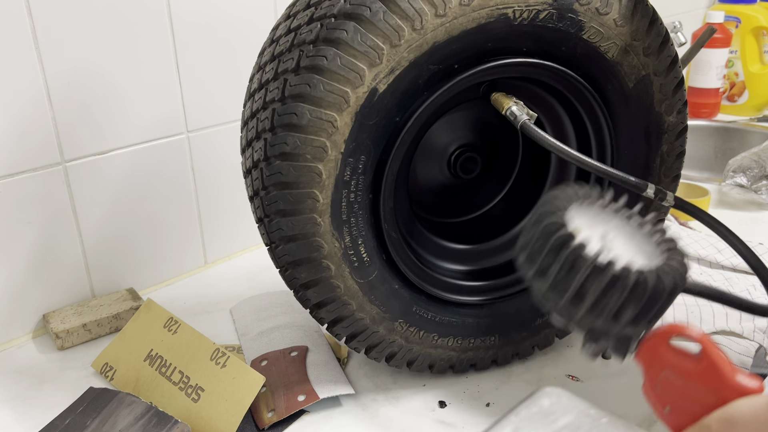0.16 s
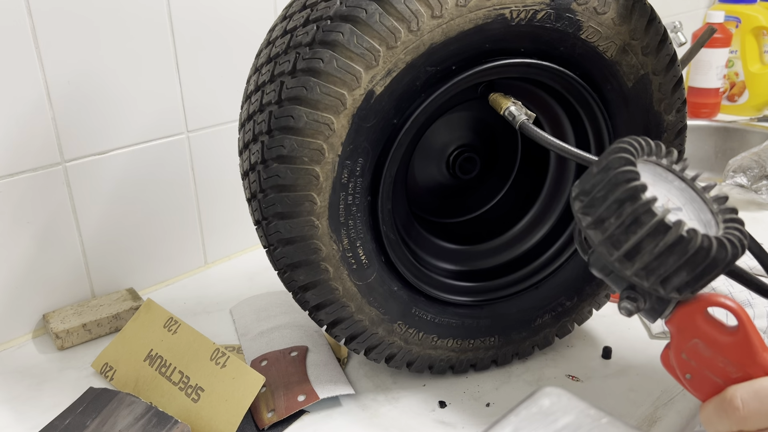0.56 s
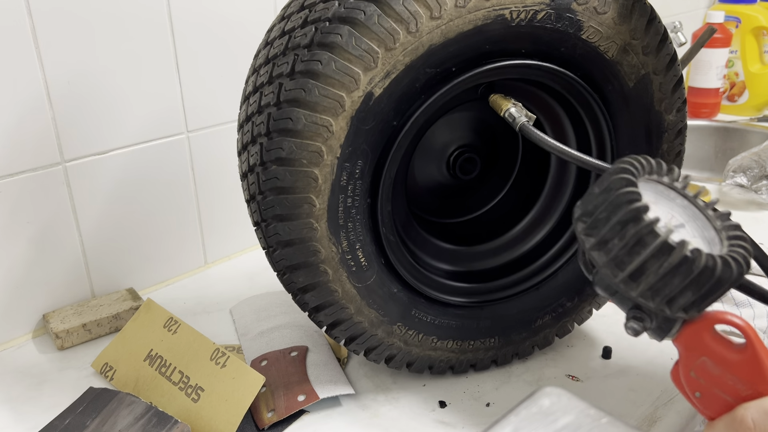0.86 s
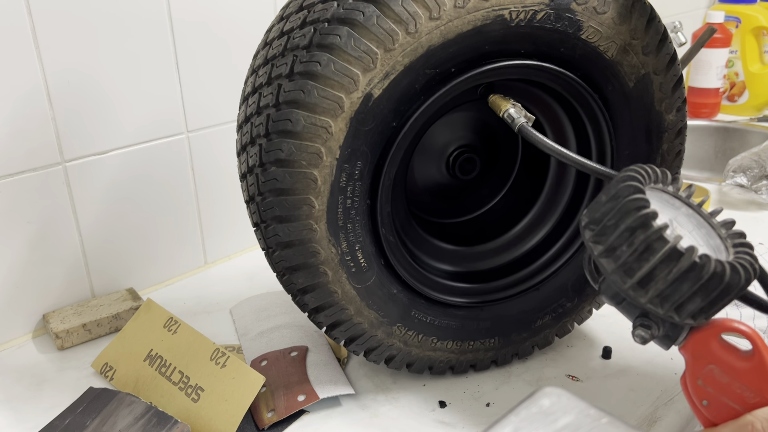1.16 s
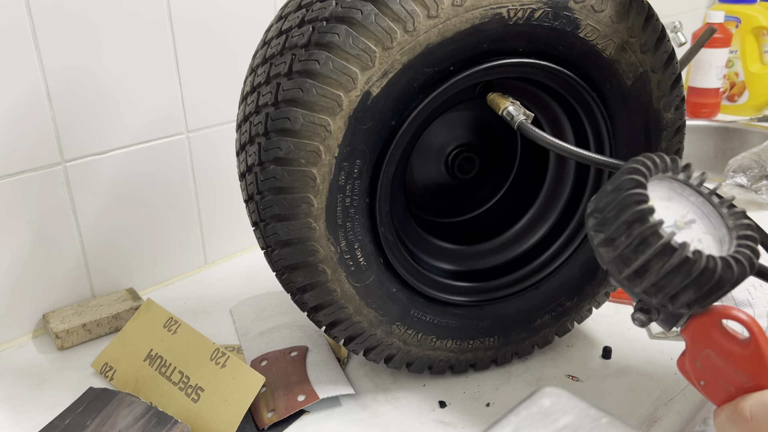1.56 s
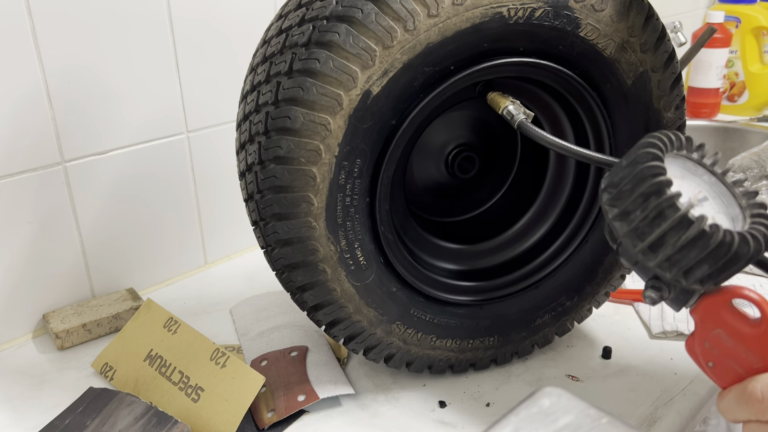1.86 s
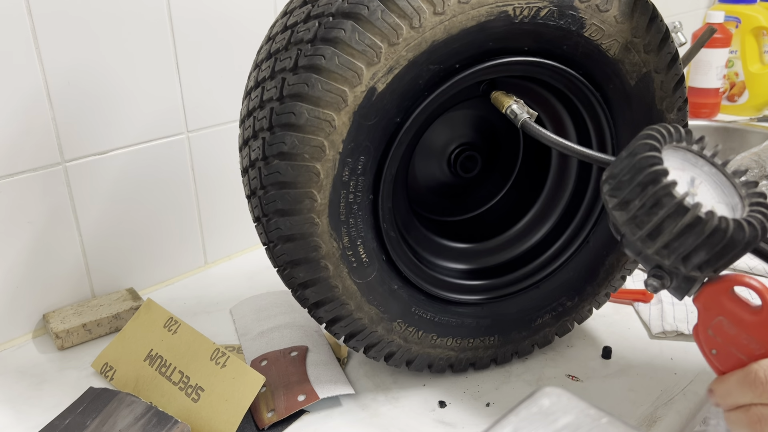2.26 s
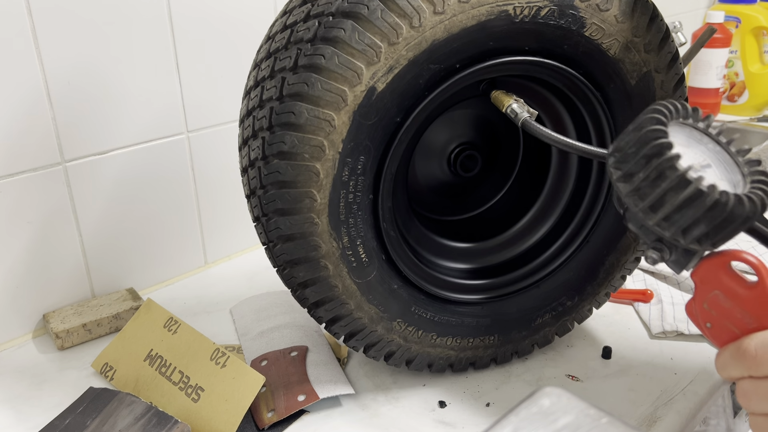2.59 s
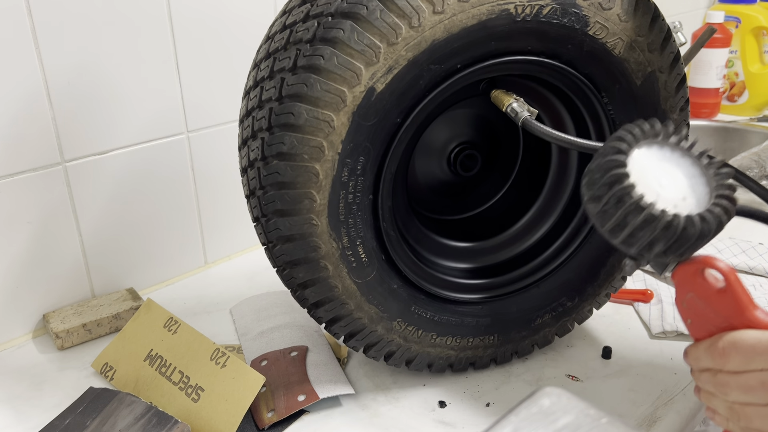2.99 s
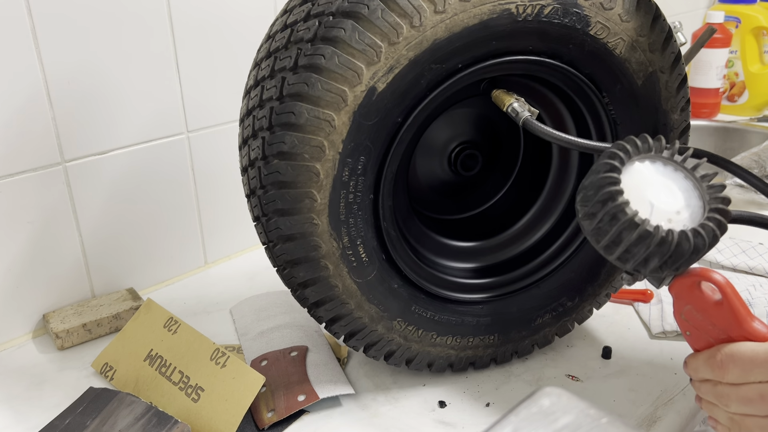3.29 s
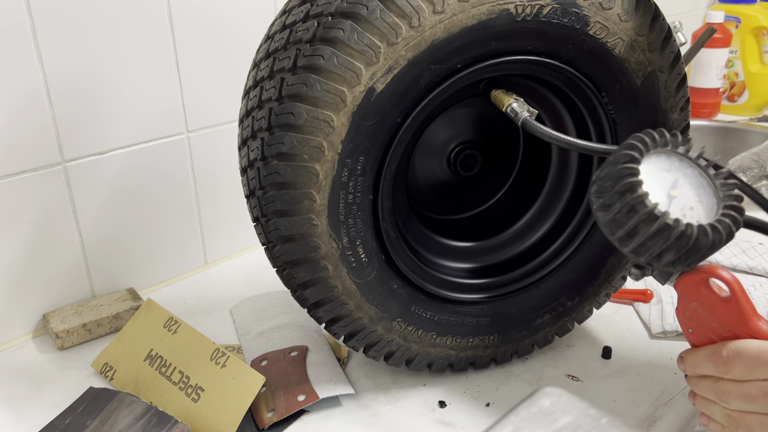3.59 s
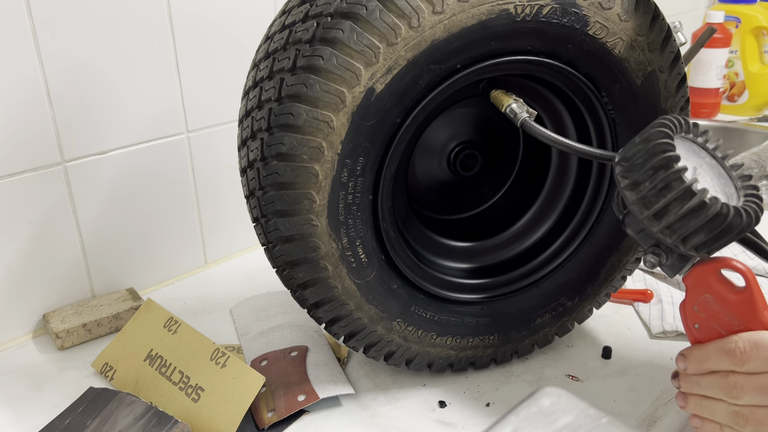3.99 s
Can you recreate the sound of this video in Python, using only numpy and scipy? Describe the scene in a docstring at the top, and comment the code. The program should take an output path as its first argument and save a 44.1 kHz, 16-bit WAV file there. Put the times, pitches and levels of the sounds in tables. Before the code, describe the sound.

A small piston compressor drones indoors, feeding a tyre through a hose and trigger inflator. Its throbbing hum swells as the motor whines and air rushes. Early on, the inflator bumps softly and the valve whistles faintly, on and off. Past the middle, the trigger snaps sharply close to the microphone. A shrill tone in the whine rises and fades, and the drone eases slightly.

```python
"""A small piston compressor drones indoors, feeding a tyre through a hose and a trigger inflator.
From 0.3 s it gathers speed and swells: the strokes fatten under load, the geared motor whines, air rushes.
The inflator bumps softly at 0.6 s; the valve whistles faintly, on and off, until 1.9 s.
At 2.7 s the trigger snaps close to the microphone, whose gain dips for a moment.
One shrill tone of the whine swells and fades; from 3.3 s the load eases, then the loudness."""
import sys
import numpy as np
from scipy import signal
from scipy.fft import rfft, irfft
from scipy.io import wavfile

SR = 44100
rng = np.random.default_rng(int(sys.argv[2]) if len(sys.argv) > 2 else 0)


def digitize_waveform(pressure):
    """Quantize a signal to 16-bit integers and store it at the path in sys.argv[1].

    Rows of a 2-D input are taken as channels; values are limited to [-1, 1].
    """
    field = np.atleast_2d(pressure).T
    bounded = np.clip(field, -1, 1)
    quanta = np.round(bounded * 32767).astype(np.int16)
    wavfile.write(sys.argv[1], SR, quanta)


N = 182641
T = np.arange(N) / SR

# phase between the two microphone ports: freq_hz, left_lead_rad
PORT_LEAD = [(100, 0), (600, -.2), (870, 1.8), (1200, -.4), (3000, 1), (7200, 1.1), (8500, 0),
             (10200, -3.1), (12000, -6.2), (13800, -9.4), (15600, -12.5)]


def gain_of(db):
    """Decibels to amplitude."""
    return 10 ** (np.asarray(db) / 20)


def unit_rms(x):
    """Scales to rms 1."""
    return x / np.sqrt(np.mean(x ** 2) + 1e-20)


def curve_at(points, hz):
    """Interpolates a table over log frequency."""
    freq_hz, value = np.transpose(points)
    return np.interp(np.log(hz + 1), np.log(freq_hz + 1), value)


def drift(cutoff_hz):
    """Low-passed random wander, rms 1."""
    hz = np.fft.rfftfreq(N, 1 / SR)
    return unit_rms(irfft(rfft(rng.standard_normal(N)) * np.exp(-(hz / cutoff_hz) ** 2), N))


def lagged(x, lag_s):
    """One-pole follower."""
    pole = np.exp(-1 / (lag_s * SR))
    return signal.lfilter([1 - pole], [1, -pole], x)


def plateau(start_s, end_s, fade_s):
    """Fade in, hold at 1, fade out."""
    return np.clip(np.minimum(T - start_s, end_s - T) / fade_s, 0, 1)


def swell(start_s, build_s, sag_per_s, release_s, release_per_s):
    """Envelope, 0 to 1: build, sagging hold, release."""
    built = np.clip((T - start_s) / build_s, 0, 1)
    sag = sag_per_s * np.maximum(T - start_s - build_s, 0)
    release = release_per_s * np.maximum(T - release_s, 0)
    return np.clip(built - sag - release, 0, 1)


def port_gains(balance_db, lead_rad):
    """Complex left and right gains, mean power 1."""
    left = gain_of(balance_db / 2) * np.exp(1j * lead_rad / 2)
    return np.array([left, 1 / left]) / np.sqrt((abs(left) ** 2 + abs(left) ** -2) / 2)


def tone(phase_turns, rms_db, balance_db):
    """One sinusoid at both ports."""
    mean_hz = (phase_turns[-1] - phase_turns[0]) / T[-1]
    gains = port_gains(balance_db, curve_at(PORT_LEAD, mean_hz))[:, None]
    return np.sqrt(2) * gain_of(rms_db) * (gains * np.exp(2j * np.pi * phase_turns)).real


def noise(shape_db):
    """Partly coherent noise at both ports, rms 1, coloured by shape_db(hz)."""
    # port balance: freq_hz, left_over_right_db
    balance = [(350, 4.5), (600, -4.5), (900, 10.5), (1200, 2.5), (2000, 1), (2500, 5), (4000, 4.5),
               (5100, 15.5), (6000, 7.5), (6800, 10), (7500, 3.5), (8300, 0)]
    # likeness of the ports: freq_hz, coherence
    likeness = [(350, 0.8), (700, 0.04), (1500, 0.23), (3500, 0.4), (6800, 0.58), (8200, 1), (15000, 1)]
    hz = np.fft.rfftfreq(N, 1 / SR)
    common, separate = rfft(rng.standard_normal((2, N)))
    coherence = np.clip(curve_at(likeness, hz), 0, 1)
    spectra = np.array([common, coherence * common + np.sqrt(1 - coherence ** 2) * separate])
    gains = port_gains(curve_at(balance, hz), curve_at(PORT_LEAD, hz))
    return unit_rms(irfft(spectra * gains * gain_of(shape_db(hz)), N))


def coupling_leak(level_db=-60):
    """Faint, even hiss at the hose coupling."""
    # hiss spectrum: freq_hz, relative_db
    hiss = [(500, -25), (2400, -14), (4000, -10), (10500, -3), (15500, -1)]
    return gain_of(level_db) * noise(lambda hz: curve_at(hiss, hz))


def valve_whistles():
    """Narrow valve resonances sound briefly in the flow."""
    # whistles: start_s, end_s, pitch_hz, width_hz, level_db
    whistles = [(0.175, 0.59, 9160, 168, -60), (.42, .85, 10600, 120, -61), (1.2, 1.87, 10600, 120, -57)]
    out = np.zeros((2, N))
    for start_s, end_s, pitch_hz, width_hz, level_db in whistles:
        band = noise(lambda hz: -10 * np.log10(1 + (2 * (hz - pitch_hz) / width_hz) ** 2))
        out += gain_of(level_db) * plateau(start_s, end_s, fade_s=0.066) * band
    return out


def air_rush(crank_turns, flow_db, boost_db=8, surge_depth=0.021, lag_turns=0.19, flutter_db=0.5):
    """Turbulent air rings the pipework and surges slightly after each stroke."""
    # turbulence spectrum: freq_hz, relative_db
    turbulence = [(20, -40), (45, -8), (100, -12), (180, -9), (350, 3.5), (440, -2.5), (520, -2.5),
                  (1150, -5), (1600, -10.5), (1950, -15.5), (2400, -14), (3000, -19.5), (7200, -28),
                  (8500, -26.5), (11000, -29), (15500, -42.5)]
    # hose and housing resonances: centre_hz, width_hz, peak_db
    resonances = [(1225, 34, 0.5), (1590, 150, 2.5), (2455, 69, 4), (3555, 130, 4.5), (5230, 1350, 4),
                  (9800, 35, -25), (10300, 68, 9)]

    def shape_db(hz):
        peaks_db = sum(peak_db / (1 + (2 * (hz - centre_hz) / width_hz) ** 2)
                       for centre_hz, width_hz, peak_db in resonances)
        return curve_at(turbulence, hz) + peaks_db

    surge = 1 + surge_depth * np.cos(2 * np.pi * (crank_turns - lag_turns))
    return noise(shape_db) * surge * gain_of(flow_db + boost_db + flutter_db * drift(17))


def geared_motor(crank_turns, load, hum_db, flow_db, gear_ratio=4.8854, ripple_hz=100, play_turns=0.0024):
    """Rotor unbalance beats against the pump; the slots whine, split by mains ripple."""
    # beat tones: motor_order, pump_order, ripple_order
    beat_orders = [(1, 0, 0), (1, 1, 0), (1, 2, 0), (0, 2, 1), (0, 3, 1), (0, 4, 1), (0, 5, 1), (0, 5, -1),
                   (0, 6, -1), (0, 0, 2), (0, 8, -1), (0, 9, -1)]
    # beat levels at full load, re hum_db: level_db
    beat_levels = [-13.5, -14.5, -33, -22.5, -17, -18, -16.5, -25, -24.5, -25.5, -23, -38.5]
    # whine tones: motor_order, ripple_order
    whine_orders = [(12, 0), (12, 1), (12, -1), (24, 0), (18, -1), (18, 1)]
    # whine levels re flow_db: level_db
    whine_levels = [-13, -15.5, -22, -49, -24, -36]
    shaft_turns = gear_ratio * crank_turns + 0.0029 * drift(1.5)
    rough_turns = shaft_turns + play_turns * drift(110)  # gear play roughens the whine
    ripple_turns = ripple_hz * T
    buzz = 1 + 0.26 * np.cos(2 * np.pi * crank_turns)  # each stroke loads the gear teeth
    strain_db = hum_db - 5 * (1 - load)
    out = np.zeros((2, N))
    for (motor_order, pump_order, ripple_order), level_db in zip(beat_orders, beat_levels):
        offset_turns = 0.22 + 0.68 * pump_order if motor_order else rng.random()
        turns = motor_order * shaft_turns + pump_order * crank_turns + ripple_order * ripple_turns
        out += tone(turns + offset_turns, strain_db + level_db + 0.5 * drift(4.6), balance_db=0)
    for (motor_order, ripple_order), level_db in zip(whine_orders, whine_levels):
        turns = motor_order * rough_turns + ripple_order * ripple_turns + rng.random()
        out += buzz * tone(turns, flow_db + level_db + 1.3 * drift(30), balance_db=9.5)
    shrill_db = flow_db - 19 + 8 * plateau(start_s=2.67, end_s=3.87, fade_s=0.44)
    return out + buzz * tone(18 * rough_turns, shrill_db + 0.84 * drift(8), balance_db=11)


def crank_angle(load, idle_hz=57.271, running_hz=58.046, spin_up_at_s=0.301, settle_s=0.732):
    """Crank angle in turns, one per stroke, as the pump settles to running speed."""
    zero_angle_s, load_advance_turns = 0.0637, 0.0361  # loaded strokes peak earlier
    speed_hz = running_hz + (idle_hz - running_hz) * np.exp(-np.maximum(T - spin_up_at_s, 0) / settle_s)
    turns = np.cumsum(speed_hz) / SR
    return turns - np.interp(zero_angle_s, T, turns) + load_advance_turns * load


def piston_pump(crank_turns, load, hum_db, throb_harmonics=6):
    """Low harmonics join in one throb per stroke; the room scatters the higher ones, which waver."""
    # stroke harmonics from the first, re hum_db: idle_db, loaded_db, left_over_right_db
    harmonics = [(-16, -18, -1), (-9.5, -4.5, 2.5), (-9.5, -11, -8.5), (-4, -11.5, 0.5), (-3, -3.5, 5),
                 (-4, -7.5, 5), (-12.5, -29, -2), (-28.5, -21.5, -22), (-37, -12.5, 3.5), (-18, -20.5, -14),
                 (-21.5, -20.5, 19), (-23, -23, -10), (-26, -25.5, -46), (-33, -31.5, -19),
                 (-94, -18.5, -4), (-17, -20, -38), (-93, -44, 58), (-20.5, -22.5, -28), (-29, -61, 30),
                 (-25, -23, 14), (-28, -58, -9), (-54, -68, 2), (-27, -31.5, -23), (-26, -37, 10)]
    out = np.zeros((2, N))
    for order, (idle_db, loaded_db, balance_db) in enumerate(harmonics, 1):
        if order <= throb_harmonics:
            shift_turns = -0.015 + 0.038 * (order - 4) ** 2  # dispersion around the casing resonance
            waver_db = 0.31
        else:
            shift_turns = rng.random() + 0.032 * drift(8.3)
            waver_db = 1.0
        level_db = hum_db + idle_db + load * (loaded_db - idle_db) + waver_db * drift(8.2)
        out += tone(order * crank_turns + shift_turns, level_db, balance_db)
    return out


def inflator_knocks(crack_decay_s=0.0013, room_db=-18, rise_s=0.0025, tilt_pivot_hz=129.3):
    """Each knock rings the inflator's low modes; its short crack reverberates in the tiled room."""
    # bump, then trigger snap: start_s, thump_db, tilt_db_per_octave, crack_db
    knocks = [(0.6194, -22.5, -5.5, -48), (.638, -29, -12, -37), (2.7273, -10.5, 1, -2.5),
              (2.742, -21.5, 4, -38), (2.799, -26, -8, -50)]
    # inflator and hose modes: pitch_hz, level_db, t60_s
    modes = [(73.4, -18, 0.28), (129.3, 1, 0.17), (165.6, 5, 0.16), (287.2, 1, 0.12), (343.6, -3.5, 0.21),
             (432, 2, 0.16), (814, -17, 0.086), (1242, -13, 0.058)]
    # crack spectrum: freq_hz, relative_db
    crack_spectrum = [(30, 7), (150, 7), (400, 16.5), (900, -0.5), (1600, -2.5), (3000, -11), (4500, -19.5),
                      (6300, -30), (8300, -21), (15000, -34)]
    # room decay: freq_hz, t60_s
    room_decay = [(100, .35), (500, 0.91), (2000, 0.32), (8000, .08)]
    out = np.zeros((2, N))
    for start_s, thump_db, tilt_db_per_octave, crack_db in knocks:
        age_s = np.maximum(T - start_s, 0)
        attack = 1 - np.exp(-age_s / rise_s)
        for pitch_hz, level_db, t60_s in modes:
            tilt_db = tilt_db_per_octave * np.log2(pitch_hz / tilt_pivot_hz)
            ring_db = thump_db + level_db + tilt_db - 60 * age_s / t60_s
            out -= gain_of(ring_db) * np.cos(2 * np.pi * pitch_hz * age_s) * attack
        burst = noise(lambda hz: curve_at(crack_spectrum, hz))
        bin_hz, frame_s, spectra = signal.stft(burst, SR, nperseg=256)
        fade = gain_of(-60 * np.maximum(frame_s - start_s, 0) / curve_at(room_decay, bin_hz)[:, None])
        tail = signal.istft(spectra * fade, SR, nperseg=256)[1][:, :N]
        onset = np.clip((T - start_s) / rise_s + 1, 0, 1)  # the crack just precedes the thump
        crack = burst * np.exp(-age_s / crack_decay_s)
        out += gain_of(crack_db) * onset * (crack + gain_of(room_db) * tail)
    return out


def scene():
    """Load and loudness swell once; one crank angle drives pump, motor and air."""
    load_swell = swell(start_s=0.47, build_s=1.54, sag_per_s=0.022, release_s=3.32, release_per_s=0.73)
    loudness = swell(start_s=0.34, build_s=1.85, sag_per_s=0.062, release_s=3.62, release_per_s=0.52)
    load = load_swell ** 0.69  # builds early
    hum_db = -31.5 + 12 * loudness
    flow_db = -48 + 12 * loudness ** 1.41  # builds late
    crank_turns = crank_angle(load)
    compressor = piston_pump(crank_turns, load, hum_db) + geared_motor(crank_turns, load, hum_db, flow_db)
    return compressor + air_rush(crank_turns, flow_db) + coupling_leak() + valve_whistles() + inflator_knocks()


def record(dry, threshold_db=-14, bass_hz=220, duck_db_per_db=0.52, bass_db_per_db=0.92, edge_hz=15750):
    """Gain control ducks after the snap, later and deeper in the bass; then soft clip and low-pass."""
    power_db = 10 * np.log10(lagged((dry ** 2).mean(0), lag_s=0.0073) + 1e-12)
    fall_db = 22 * T  # the held peak falls 22 dB/s
    peak_db = np.maximum.accumulate(power_db + fall_db) - fall_db
    over_db = np.maximum(peak_db - threshold_db, 0)
    bass = signal.sosfiltfilt(signal.butter(2, bass_hz, fs=SR, output="sos"), dry)
    thinned = dry - bass + bass / gain_of(bass_db_per_db * lagged(over_db, lag_s=0.12))
    ducked = thinned / gain_of(duck_db_per_db * lagged(over_db, lag_s=0.036))
    clipped = ducked / (1 + ducked ** 8) ** (1 / 8)
    low_pass = signal.firwin(511, edge_hz, window=("kaiser", 9), fs=SR)
    return signal.oaconvolve(clipped, low_pass[None], "same")


dry = scene()
out = record(dry)
digitize_waveform(out)
```